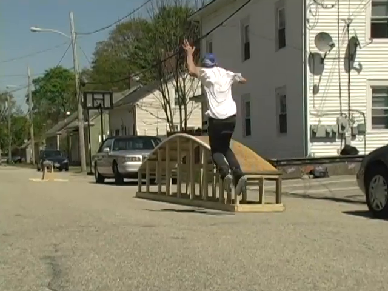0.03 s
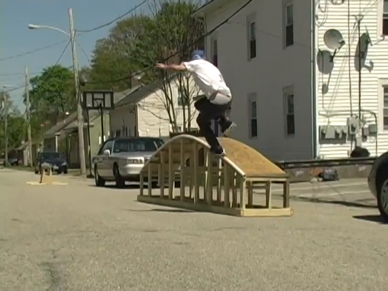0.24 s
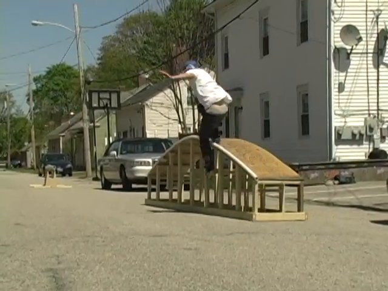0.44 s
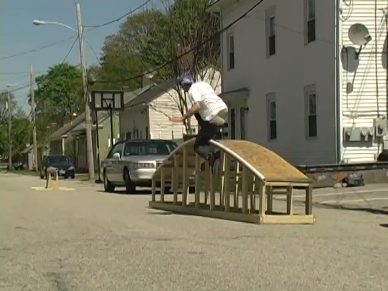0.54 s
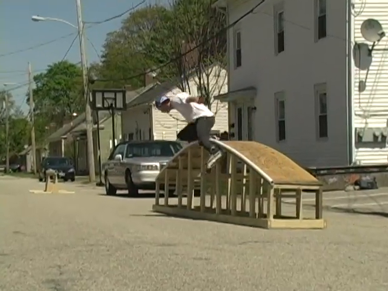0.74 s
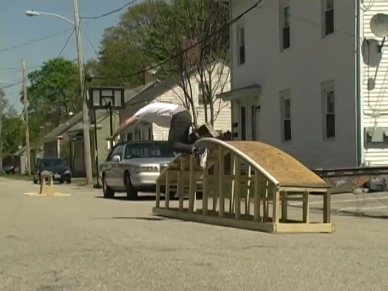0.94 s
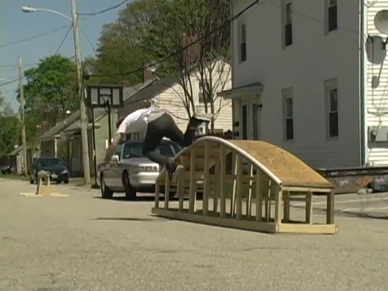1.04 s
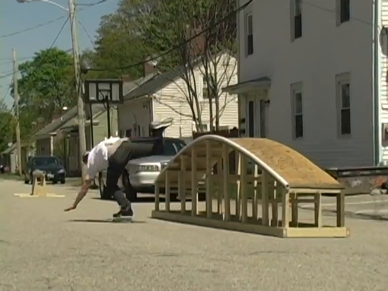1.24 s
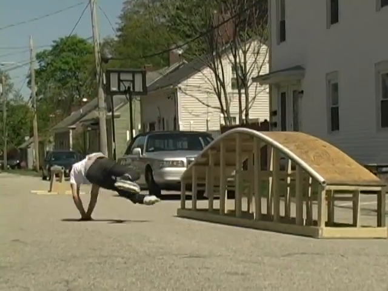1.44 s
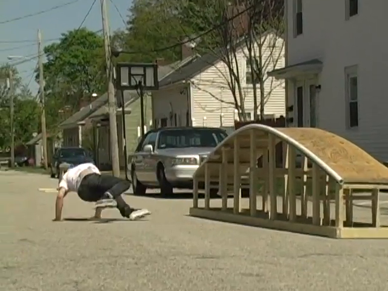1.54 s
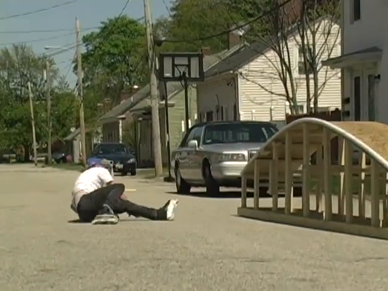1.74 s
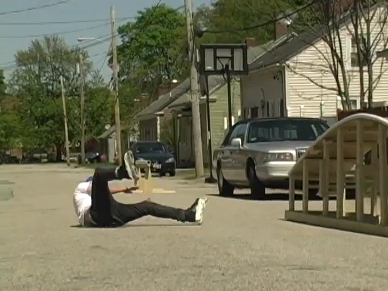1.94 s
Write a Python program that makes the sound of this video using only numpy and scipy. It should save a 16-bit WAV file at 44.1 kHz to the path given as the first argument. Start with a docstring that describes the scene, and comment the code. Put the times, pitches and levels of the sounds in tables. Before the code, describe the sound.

Inline skates clack onto a hollow wooden box, grind across it, then crash on pavement.

```python
"""An inline skater jumps onto an arched wooden box, grinds over it, catches the far end and falls.
Hard skates clack on wood and pavement, the hollow box booms and knocks, wheels and clothes scrape.
Heard from a close pair of microphones in a quiet street, the skater straight ahead.
A house wall throws each blow back; traffic hums in the distance."""
import sys
import numpy as np
from scipy import signal
from scipy.fft import irfft
from scipy.io import wavfile

SR = 44100
rng = np.random.default_rng(int(sys.argv[2]) if len(sys.argv) > 2 else 0)


def wav_out(sig):
    """Save sig, one row per channel (or a flat mono array), as 16-bit PCM at SR to the path in sys.argv[1]."""
    wavfile.write(sys.argv[1], SR, np.round(np.clip(np.atleast_2d(sig).T, -1, 1) * 32767).astype(np.int16))


N = 88200
T = np.arange(N) / SR
EVENT_T = T[:N // 4]  # half a second for each blow or scrape


def amp(db):
    """Decibels to gain."""
    return 10 ** (np.asarray(db) / 20)


def unit(x):
    """Scales to rms 1."""
    return x / np.sqrt(np.mean(x ** 2) + 1e-20)


def fader(points):
    """Gain over the scene from (seconds, dB) points."""
    return amp(np.interp(T, *np.transpose(points)))


def read(points, hz):
    """Reads a spectrum on a log-frequency axis."""
    f, value = np.transpose(points)
    return np.interp(np.log(hz + 1), np.log(f + 1), value)


def add(mix, start, sound):
    """Mixes a sound in at a start time in seconds."""
    part = mix[max(round(start * SR), 0):][:len(sound)]
    part += sound[:len(part)]


def colour(x, points, size=4096):
    """Minimum-phase filter with the given (Hz, dB) shape."""
    log_gain = np.log(amp(read(points, abs(np.fft.fftfreq(size, 1 / SR)))))
    taps = np.fft.ifft(np.exp(np.conj(signal.hilbert(log_gain)))).real
    return signal.fftconvolve(x, taps[:size // 2])[:len(x)]


def band(hz, width_hz):
    """Noise in one resonance."""
    f = np.fft.rfftfreq(N, 1 / SR)
    phases = np.exp(2j * np.pi * rng.random(len(f)))
    return unit(irfft(phases / (1 + (2 * (f - hz) / width_hz) ** 2), N))


def ring(hz, db, t60):
    """One dying mode."""
    return amp(db) * np.exp(-np.log(1000) * EVENT_T / t60) * np.sin(2 * np.pi * hz * EVENT_T)


def grit(grain_db, count=N, grain_s=.0008):
    """Noise whose strength jumps from one tiny contact to the next."""
    noise, jumps = rng.standard_normal((2, count))
    return unit(noise * amp(grain_db * np.interp(T[:count] / grain_s, np.arange(count), jumps)))


def burst(envelope, levels_db, grain_db):
    """A shower of tiny contacts under an envelope, coloured by four band levels."""
    contacts = grit(grain_db, len(envelope)) * envelope
    contacts *= np.linalg.norm(envelope) / np.linalg.norm(contacts)
    low, mid, bright, top = levels_db
    shape = [(50, low - 14.5), (250, low), (1000, mid), (2000, (mid + bright) / 2 - 2), (4200, bright),
             (6000, bright - 4), (8300, top + 6), (11500, top), (16000, top - 18)]
    return colour(contacts, shape)


def traffic(rumble_db=-37.5, hum_db=-41):
    """Diffuse rumble from far off with a wavering engine hum, as mid and side."""
    # The distant rumble's spectrum. Each row: frequency in Hz, level in dB.
    spectrum = [(20, -28), (40, -17.5), (62, -5.5), (82, -4.5), (115, -4.5), (135, -2.5), (175, -3),
                (260, -8), (450, -16), (1000, -19.5), (2500, -28.5), (5000, -39), (9000, -47.5),
                (15000, -54.5)]
    mid, side = (unit(colour(x, spectrum)) * amp(rumble_db) for x in rng.standard_normal((2, N)))
    hum = amp(hum_db) * band(109.8, width_hz=10)
    return mid + hum, side * amp(-2)


def rolling():
    """Low rumble of wheels rolling, then of the body sliding."""
    # The rumble's course. Each row: time in seconds, level in dB.
    levels = [(0, -37), (.2, -40.5), (.37, -34.5), (.6, -48), (.9, -39), (1.03, -32), (1.14, -38.5),
              (1.29, -30), (1.36, -33), (1.43, -72), (1.58, -50), (1.7, -40), (2, -45.5)]
    # Its dull tone. Each row: frequency in Hz, level in dB.
    spectrum = [(50, -17.5), (85, 12), (120, 6.5), (220, 1), (450, -5), (700, -14), (1400, -19),
                (3000, -25.5), (7000, -38.5), (16000, -52)]
    return unit(colour(grit(grain_db=2.5), spectrum)) * fader(levels)


def blow(decay, *levels_and_clack):
    """A skate rattles for a few milliseconds and its hard shell rings."""
    # The shell's modes. Each row: multiple of the clack pitch, level in dB, t60 in seconds.
    shell_modes = [(.35, -12.5, 0.03), (0.982, -4, 0.02), (1.024, -8.5, 0.0095), (1.62, -17.5, 0.027),
                   (1.85, -17.5, 0.012)]
    *levels_db, clack_hz, clack_db = levels_and_clack
    rattle = burst(np.exp(-EVENT_T / decay), levels_db, grain_db=2.5)
    return rattle + sum(ring(clack_hz * ratio, clack_db + db, t60) for ratio, db, t60 in shell_modes)


def pavement_blows():
    """Skates and pads strike the pavement at take-off and in the fall."""
    # Each row: start in seconds, rattle decay in seconds, low, mid, bright and top levels in dB,
    # clack pitch in Hz, clack level in dB.
    strikes = [(.207, 0.0013, -2, -27, -19, -26, 4870, -17),
               (0.2092, 0.0034, -13, -5.5, -14, -32.5, 5720, -21),
               (1.1737, 0.012, -5, -17, -32.5, -48, 3000, -50),
               (1.189, 0.0045, -3, 0, -13, -30.5, 3850, -10), (1.198, 0.0065, 5, -8, -22, -35, 4670, -44),
               (1.278, 0.0045, -22, -21, -25.5, -55, 3280, -25),
               (1.296, .002, -16, -25, -23, -40, 3820, -39), (1.3263, 0.0012, -7, -38, -23, -41, 3440, -64),
               (1.5597, 0.0056, -4.5, -0.5, -4, -25.5, 2930, -6.5),
               (1.594, 0.0025, -14, -6.5, -9.5, -25, 2680, -28),
               (1.5995, 0.0016, 8, 8, 6.5, -14.5, 3430, -10),
               (1.6012, 0.0067, -1, -0.5, 0.5, -27, 3630, -9),
               (1.6115, 0.00075, -16, -1, 1, -12.5, 2980, -17),
               (1.6163, 0.0023, -27, -15, -18, -26, 4180, -10),
               (1.656, 0.0015, -31, -16, -22, -44, 3320, -19),
               (1.986, 0.0049, -38, -26, -39.5, -45, 4900, -45)]
    out = np.zeros(N)
    for start, *skate in strikes:
        add(out, start, blow(*skate))
    return out


def scrapes(squeal_q=10):
    """Short skids of wheels, pads and clothes swell and die away, each with one rough resonance."""
    # Each row: start, rise and decay in seconds, low, mid, bright and top levels in dB,
    # squeal pitch in Hz, squeal level in dB.
    skids = [(.246, 0.0096, .013, -4, -12.5, -18.5, -39, 993, -23),
             (.322, 0.0048, 0.013, -24, -21.5, -43, -60, 2100, -40),
             (.502, 0.0097, .022, -5.5, -13, -28, -39.5, 680, -33),
             (0.541, 0.0054, .010, -16, -49, -19.5, -36, 2400, -37),
             (.628, 0.0075, 0.035, -14, -11.5, -21.5, -47, 707, -29.5),
             (.906, 0.016, 0.013, -9.5, -24, -30, -39, 12900, -45),
             (1.359, 0.018, 0.0092, -29, -24, -27, -48, 2050, -40.5),
             (1.476, 0.038, 0.028, -46, -34, -36.5, -54.5, 2360, -50),
             (1.575, 0.0069, 0.017, -19, -13.5, -20.5, -40, 1000, -30),
             (1.651, 0.019, 0.039, -16, -12.5, -22.5, -45.5, 1890, -32.5),
             (1.722, .009, 0.0053, -18, -28, -26, -44, 3540, -37),
             (1.820, 0.0051, 0.015, -17.5, -28, -35, -58, 4816, -59)]
    out, t = np.zeros(N), EVENT_T
    for start, rise, decay, *levels_db, squeal_hz, squeal_db in skids:
        envelope = np.minimum(t / rise, 1) * np.exp(-np.maximum(t - rise, 0) / decay)
        squeal = amp(squeal_db) * envelope * band(squeal_hz, squeal_hz / squeal_q)[:len(t)]
        add(out, start, burst(envelope, levels_db, grain_db=4) + squeal)
    return out


def box_blows():
    """Skates strike the hollow box and its timber frame booms."""
    # Each row: start in seconds, rattle decay in seconds, low, mid, bright and top levels in dB,
    # clack pitch in Hz, clack level in dB, boom level in dB.
    strikes = [(.2472, 0.0015, -24, -11, -11, -31.5, 4300, -32, -41),
               (.253, .011, -9.5, -14, -21, -53, 2940, -14, -32),
               (.4182, 0.0055, 2, -0.5, -17, -28.5, 2840, -10, -16.5),
               (0.422, 0.0058, 8.5, 2.5, -3.5, -22, 2590, -10.5, -21),
               (.440, 0.011, -3, -2, -14.5, -30.5, 3150, -11.5, -36),
               (.499, 0.0072, -6, -4, -18, -45, 3660, -15.5, -27.5),
               (0.614, 0.0037, -22, -11, -34, -58, 3000, -40, -44),
               (0.641, 0.0027, -25, -25, -24, -38, 2830, -17, -36.5),
               (0.8, 0.0046, -10, -44, -14.5, -42, 4870, -20, -47),
               (0.833, 0.0038, -9, -10.5, -13.5, -27, 5960, -15.5, -34.5),
               (.869, 0.0029, -22, -29, -24, -43, 4630, -29.5, -54),
               (0.9122, 0.0026, -11, -18, -33, -48, 2380, -44, -49),
               (.977, 0.0035, -4, -32, -6.5, -28.5, 4700, -14, -35),
               (0.9821, 0.0086, -10.5, -13.5, -17.5, -34, 5520, -20, -60)]
    # The frame's modes. Each row: frequency in Hz, level in dB, t60 in seconds.
    frame_modes = [(88.7, -13.5, 0.94), (112, -2.5, 0.23), (158.2, -3.5, 0.31), (212.5, -7, 0.29),
                   (363, 0.5, 0.3), (414.3, 3, 0.17), (675, -3.5, 0.12), (1018, -2.5, 0.065),
                   (1130, -4.5, .12), (1309, 2.5, 0.099), (1427, -4.5, 0.13), (1770, -17, 0.13),
                   (2152, -16, 0.22), (2550, -5, 0.084)]
    boom = sum((-1) ** k * ring(*mode) for k, mode in enumerate(frame_modes))
    out = np.zeros(N)
    for start, *skate, boom_db in strikes:
        add(out, start, blow(*skate) + amp(boom_db) * boom)
    return out


def grind(catch_db=1.8, catch_s=.013):
    """The soles catch and slip along the edge of the box."""
    # The grind's course. Each row: time in seconds, level in dB.
    levels = [(.41, -71), (.44, -30), (.58, -34.5), (.69, -32), (.76, -33), (.82, -33), (.89, -44),
              (.96, -66), (1.1, -71)]
    # Its gritty tone. Each row: frequency in Hz, level in dB.
    spectrum = [(60, -3), (150, 3), (260, 1.5), (420, 5.5), (750, -1), (1600, -8), (2800, -9.5),
                (5000, -13.5), (8000, -21.5), (12500, -29.5), (16000, -41)]
    catches = amp(catch_db * np.interp(T / catch_s, np.arange(N), rng.standard_normal(N)))
    return unit(colour(grit(grain_db=2.9) * catches, spectrum)) * fader(levels)


def frame_drone():
    """The frame drones in one low resonance under the sliding skates."""
    # The drone's course. Each row: time in seconds, level in dB.
    levels = [(.42, -70), (.455, -22), (.54, -34.5), (.62, -43.5), (.74, -40), (.81, -28.5), (.87, -48),
              (.98, -34), (1.06, -52)]
    return band(151.6, width_hz=42) * fader(levels)


def deck_knocks():
    """Wheels drop on the plywood deck; where they land sets how strongly each mode rings."""
    # Each row: start in seconds, level in dB, place across the sheet from 0 to 1.
    drops = [(0.8349, -9.5, 0.26), (0.979, -8, .33)]
    # The plywood's modes. Each row: frequency in Hz, level in dB, t60 in seconds.
    deck_modes = [(287.5, -17, 0.14), (514, -0.5, 0.062), (738, 4, 0.042), (820, -2.5, 0.03),
                  (1235, -7.5, 0.035), (1384, -17.5, 0.082)]
    out = np.zeros(N)
    for start, db, place in drops:
        modes = ((-1) ** k * np.sin(np.pi * k * place) * ring(*m) for k, m in enumerate(deck_modes, 1))
        add(out, start, amp(db) * sum(modes))
    return out


def wheel_whir(width_hz=45):
    """A freed wheel whirs roughly, its pitch falling as it slows."""
    # The spin-down. Each row: time in seconds, pitch in Hz, level in dB.
    spin = [(0.989, 450, -38), (1.038, 412.4, -34.5), (1.09, 361, -32), (1.14, 333, -46)]
    times, hz, db = np.transpose(spin)
    jitter = [1, 1j] @ rng.standard_normal((2, N))  # complex: shakes both level and phase
    wobble = 1 + .8 * np.interp(T * width_hz * 2, np.arange(N), jitter)
    tone = np.exp(2j * np.pi * np.cumsum(np.interp(T, times, hz)) / SR)
    spinning = (T > times[0]) & (T < times[-1])
    return unit((wobble * tone).real) * amp(np.interp(T, times, db)) * spinning


def scatter(x, smear_s):
    """Smears a sound over many small reflections."""
    taps = rng.standard_normal(N // 16) * np.exp(-T[:N // 16] / smear_s)
    return signal.fftconvolve(x, taps / np.linalg.norm(taps))[:N]


def wall_echo(x, level_db=-21):
    """Slap from the house wall, its delay shifting as the skater moves on."""
    # The echo's lag. Each row: time in seconds, delay in seconds.
    delays = [(.3, 0.073), (1.05, 0.071), (1.28, .089), (1.7, 0.1)]
    delayed = np.interp(T - np.interp(T, *np.transpose(delays)), T, x, left=0)
    return amp(level_db) * scatter(delayed, smear_s=.0059)


def street_tail(x, level_db=-15.5, build_s=.0067, size=256):
    """Diffuse sound between the houses, dying soonest around 9 kHz."""
    # The street's reverberation. Each row: frequency in Hz, t60 in seconds.
    decay_times = [(100, 0.89), (500, 0.85), (2000, 1), (5000, 0.57), (9000, 0.47), (16000, 0.9)]
    hz, t, noise = signal.stft(rng.standard_normal(SR), SR, nperseg=size)
    decay = np.exp(-np.log(1000) * t / read(decay_times, hz)[:, None])
    taps = signal.istft(noise * decay, SR, nperseg=size)[1]
    taps *= np.minimum(T[:len(taps)] / build_s, 1)
    return amp(level_db) * signal.fftconvolve(x, taps / np.linalg.norm(taps))[:N]


def scene(mono_below_hz=640):
    """The skater straight ahead of a close pair of microphones, with wall, street and traffic around."""
    skater = (rolling() + pavement_blows() + scrapes() + box_blows()
              + grind() + frame_drone() + deck_knocks() + wheel_whir())
    echo = wall_echo(skater)
    far_mid, far_side = traffic()
    mid = skater + echo + street_tail(skater) + far_mid
    early = amp(-21) * scatter(skater, smear_s=.0021)
    side = early + amp(-1.5) * street_tail(skater) - amp(-21.5) * echo + far_side
    # The left microphone leads slightly in phase and has more bass.
    left_lead = -amp(-19.5) * signal.hilbert(skater).imag
    left_bass = amp(-15) * signal.filtfilt(*signal.butter(1, 300, fs=SR), mid)
    side = signal.lfilter(*signal.butter(1, mono_below_hz, "high", fs=SR), side + left_lead) + left_bass
    return np.array([mid + side, mid - side])


def record(dry, clip_level=.95, edge_hz=15800):
    """The hardest blows overload the recorder, which then cuts the highest treble."""
    clipped = np.clip(dry, -clip_level, clip_level)
    lowpass = signal.firwin(401, edge_hz, window=("kaiser", 8), fs=SR)
    return signal.oaconvolve(clipped, lowpass[None], "same")


dry = scene()
out = record(dry)
wav_out(out)
```